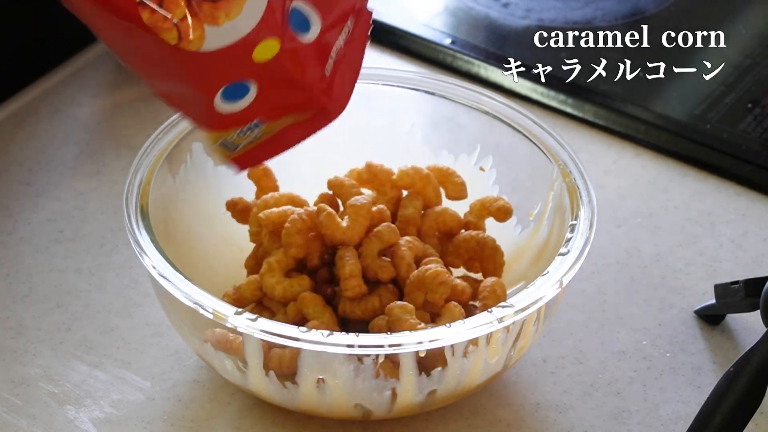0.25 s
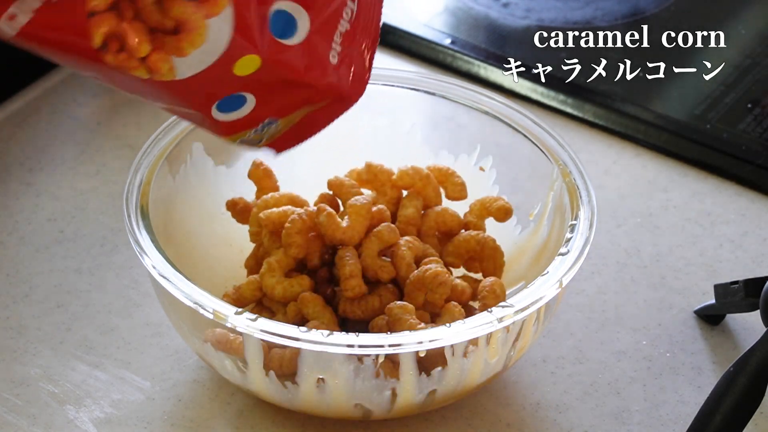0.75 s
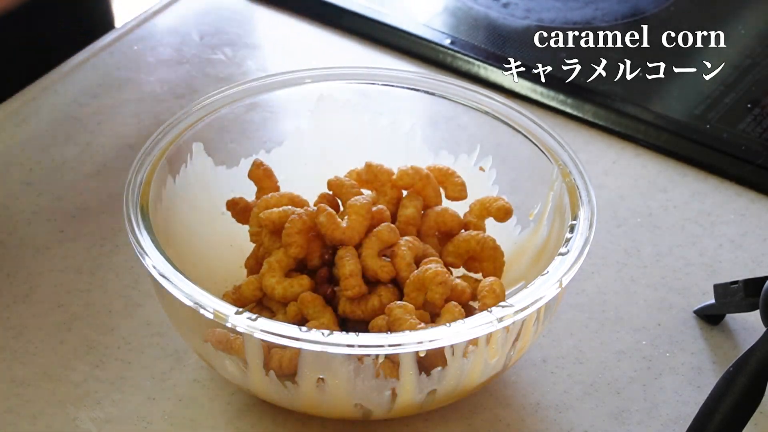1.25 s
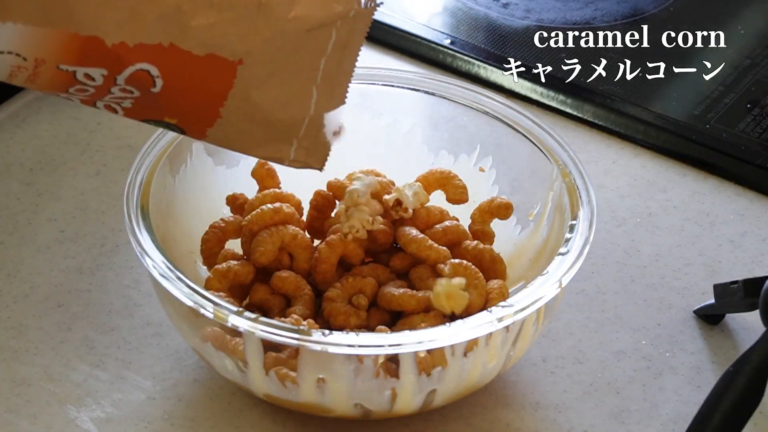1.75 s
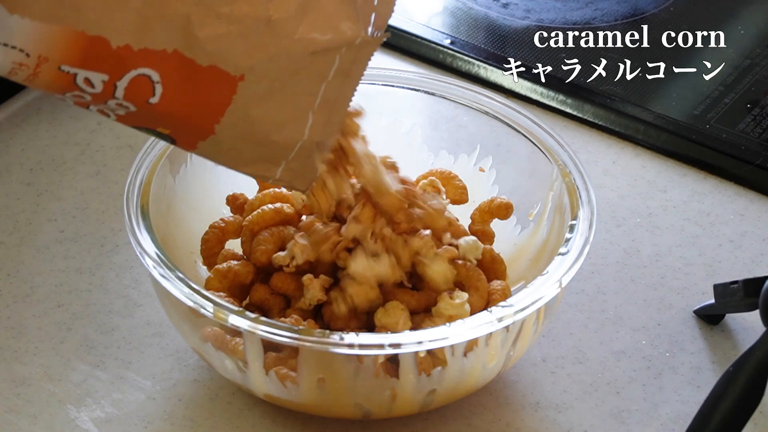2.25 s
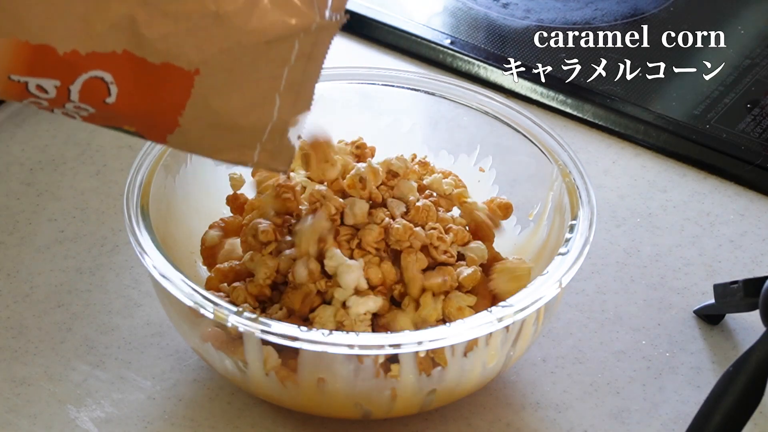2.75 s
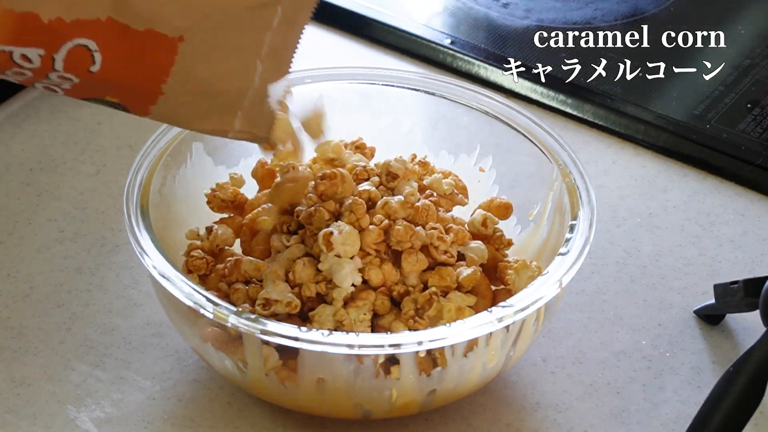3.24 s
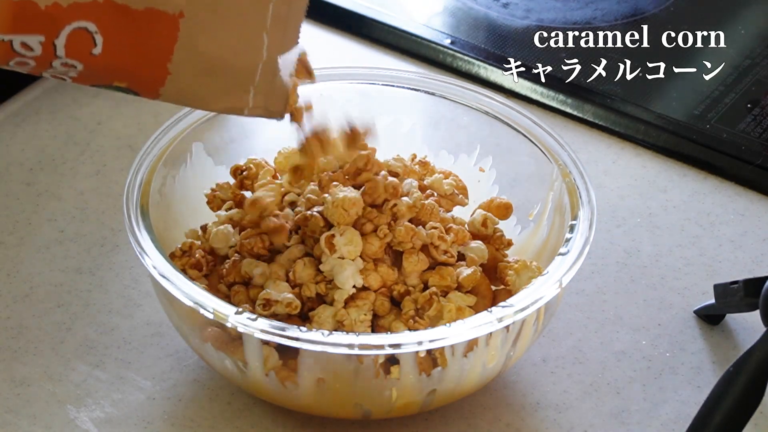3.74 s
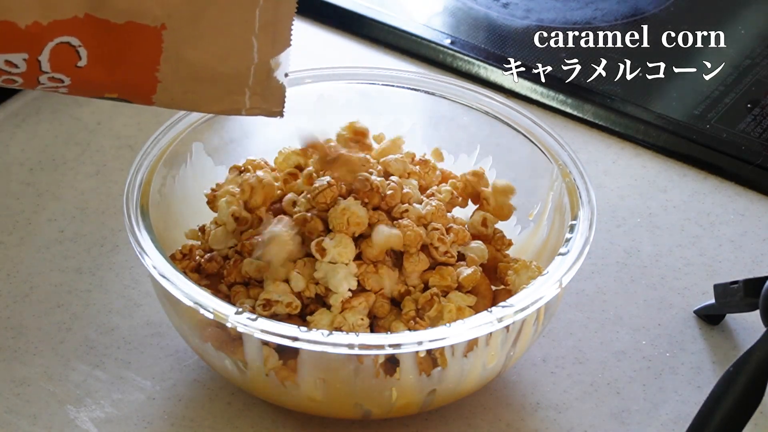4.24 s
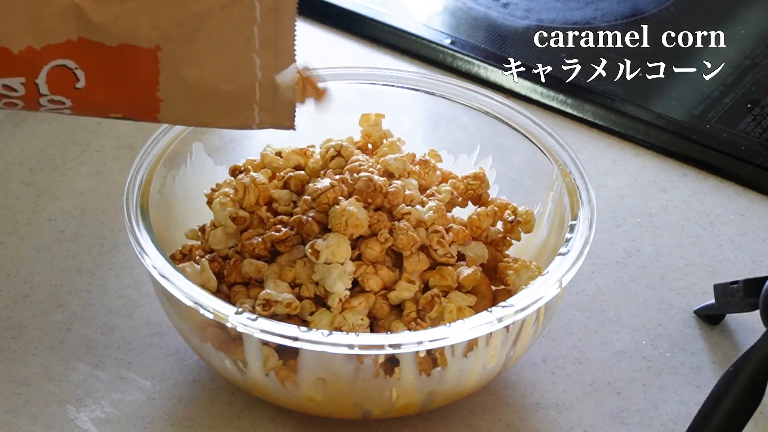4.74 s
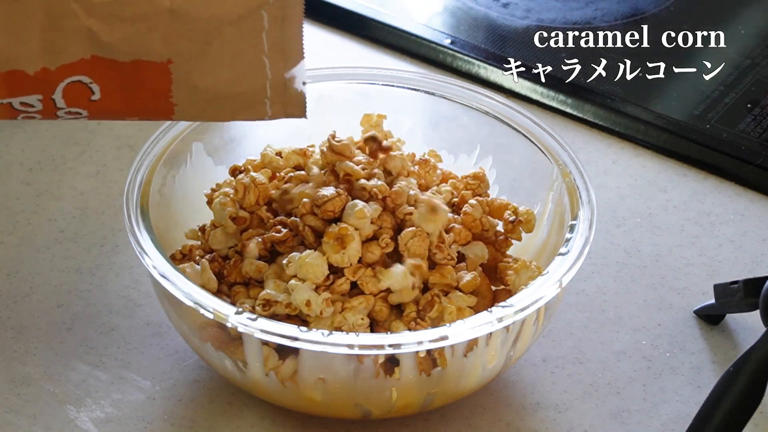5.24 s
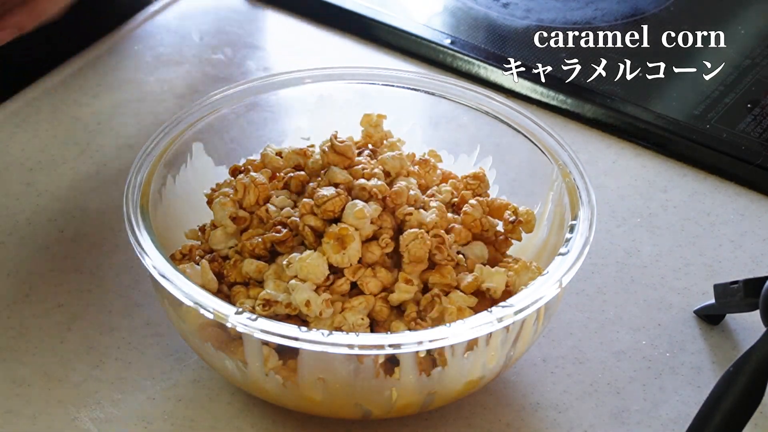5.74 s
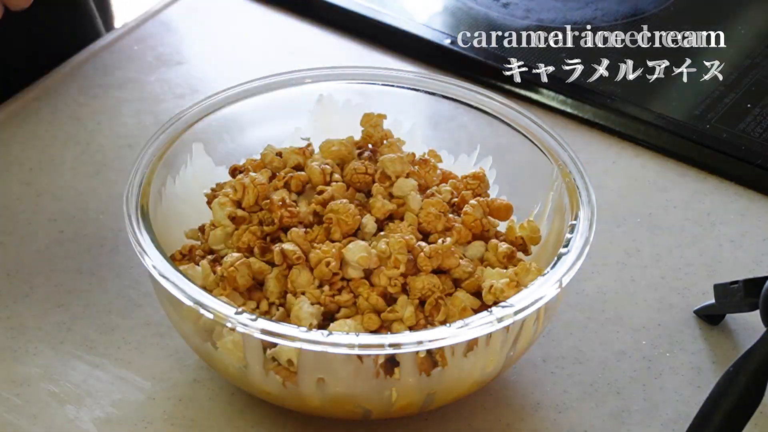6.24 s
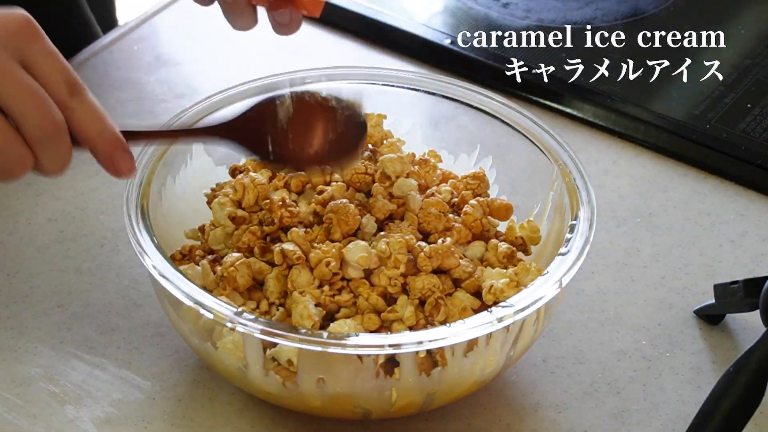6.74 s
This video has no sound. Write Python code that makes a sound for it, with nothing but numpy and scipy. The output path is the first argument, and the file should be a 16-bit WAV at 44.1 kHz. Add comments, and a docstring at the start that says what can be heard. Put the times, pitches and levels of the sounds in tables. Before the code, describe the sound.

Puffed snacks and popcorn patter from a crinkling stiff bag into a glass bowl, in swelling bursts with sharp snaps, in a small kitchen.

```python
"""In a small hard kitchen, puffed snacks are shaken out of a stiff bag into a glass bowl: three shots joined by cuts.
Pieces knock and patter on the heap and the bag crinkles: dense short rings, swelling with the stream and the handfuls.
Creases snap in dying clusters of clicks; blows on the glass and on the counter ring their modes.
A close stereo pair also hears the echoes of the room, a soft hush, an appliance's wavering lines and a motor tone."""
import sys
import numpy as np
from scipy import signal
from scipy.io import wavfile
from scipy.ndimage import uniform_filter1d

SR = 44100
rng = np.random.default_rng(int(sys.argv[2]) if len(sys.argv) > 2 else 0)


def volts(x):
    """Linear amplitude factor 10**(x/20) for a level x in dB, scalar or array-like."""
    e = np.asarray(x, float) / 20
    return 10 ** e


def output_pcm(signal):
    """Save a mono or channel-first signal as 16-bit PCM at the path in sys.argv[1].

    Samples are clipped to [-1, 1] before scaling.
    """
    pcm = np.clip(np.atleast_2d(signal).T, -1, 1) * 32767
    wavfile.write(sys.argv[1], SR, np.round(pcm).astype(np.int16))


N = 308244   # samples

# the stream of pieces and the handling of the bag, one list a shot:
# (time [s], patter of the stream [dB], crinkle of the bag [dB])
FLOW = [
    [(0.94, -74, -80), (0.95, -55.5, -44.5), (1.11, -51.5, -62), (1.39, -64, -71)],
    [(1.394, -43.5, -50), (1.72, -40, -49), (2.1, -33, -35), (2.43, -29.5, -31.5), (2.74, -39, -39),
     (3.12, -51, -55.5), (3.25, -37, -42.5), (3.33, -37.5, -38), (3.66, -45, -43.5), (3.94, -46, -49.5),
     (4.32, -49.5, -42.5), (4.56, -52.5, -64.5), (5.25, -53, -47), (5.54, -55, -59.5), (5.67, -34, -34.5),
     (5.86, -21.5, -29.5), (6.0, -35, -43), (6.24, -44, -56.5)],
    [(6.9, -81, -88), (6.93, -52, -49), (6.99, -55, -58)],
]


def rms_one(x):
    """Scales a sound to rms 1."""
    return x / np.sqrt(np.mean(x ** 2) + 1e-20)


def at_hz(points, hz):
    """Reads a curve of (frequency [Hz], value) points along log frequency."""
    return np.interp(np.log(hz), np.log(np.array(points)[:, 0]), np.array(points)[:, 1])


def high_pass(x, hz, order):
    """Butterworth filter that takes away what lies below hz."""
    return signal.sosfilt(signal.butter(order, hz, "high", fs=SR, output="sos"), x)


def without_bass(x):
    """Bag and pieces are too small to radiate low sound."""
    return high_pass(x, 731, order=4)


def ring(clicks, hz, t60):
    """A unit click sets a sine of height 1 ringing, which falls by 60 dB in t60 seconds."""
    radius = volts(-60 / (t60 * SR))
    turn = 2 * np.pi * hz / SR
    return signal.lfilter([0, np.sin(turn)], [1, -2 * radius * np.cos(turn), radius ** 2], clicks + 1e-18)


def drift(rate):
    """Chance wander of spread 1: straight lines between random knots, rate of them per second."""
    knots = rng.standard_normal(int(N / SR * rate) + 2)
    return np.interp(np.arange(N) / SR * rate, np.arange(len(knots)), knots) * np.sqrt(1.5)


def pouring(t, flow, start, end):
    """Gains of hollow knocks, patter and crinkle in one shot: the stream and the handfuls add in power."""
    # handfuls that land at one blow: (time [s], patter [dB], hollow knocks against it [dB], t60 [s])
    handfuls = [(0.001, -34, -19, .35), (1.093, -42, -5, 0.1), (1.126, -40, -2, 0.19),
                (1.151, -38, -3.5, 0.22), (1.159, -42, -5, 0.17), (1.279, -56, 7.5, 0.35),
                (1.52, -28, -17, 0.4), (1.747, -35, -9, 0.32), (1.802, -29.5, -5, 0.14),
                (1.982, -24, -8, 0.16), (2.018, -21, -14, 0.14), (2.754, -32, 1, 0.11),
                (2.781, -34.5, -8, 0.27), (3.262, -22, -8, 0.14), (3.296, -24.5, -1.5, 0.15),
                (3.881, -41, -25, 0.2), (4.064, -32, -7, 0.19), (4.12, -36.5, -13.5, 0.38),
                (4.224, -31, -20, 0.13), (4.565, -40.5, -5, .45), (6.054, -19, -11, 0.08),
                (6.241, -35, -14, 0.11), (6.926, -40.5, -27.5, 0.28)]
    # handfuls that gather and slide out:
    # (time [s], patter [dB], hollow knocks against it [dB], t60 [s], build-up [s per 30 dB])
    slides = [(1.5, -43.5, -13, 0.52, 0.5), (1.575, -36.5, 6.5, 0.55, 0.38), (3.44, -44.5, 9, 0.4, 0.4),
              (3.977, -30.5, -1, 0.49, 0.35), (4.771, -42, 2, 0.32, 0.08), (4.942, -42.5, -2, 0.22, 0.27),
              (5.08, -30.5, -2.5, 0.38, 0.0945), (6.09, -36, -3, 0.38, 0.63)]
    landing_s = 0.003           # build-up of a handful at one blow, s per 30 dB
    handful_crinkle_db = -4.5   # crinkle that goes with a handful, against its patter
    s, patter_db, crinkle_db = np.transpose(flow)
    patter = np.interp(t, s, patter_db)
    crinkle = np.interp(t, s, crinkle_db)
    # more hollow knocks while the stream swells, fewer while it thins
    trend_db_per_s = uniform_filter1d(np.gradient(patter) * SR, size=SR // 10)
    hollow = patter - 5.5 + 2.5 * np.tanh(trend_db_per_s / 8.4)
    running = t >= s[0]
    power = running * volts([hollow, patter, crinkle]) ** 2
    for at, db, hollow_db, t60, rise_s in slides + [row + (landing_s,) for row in handfuls]:
        if start <= at < end:
            shape_db = db + np.where(t < at, 30 * (t - at) / rise_s, 60 * (at - t) / t60)
            power = power + volts(shape_db + np.array([[hollow_db], [0], [handful_crinkle_db]])) ** 2
    return np.sqrt(power)


def grains(low_hz, high_hz, per_s, spread_db, cycles):
    """Tiny knocks come in clumps, each rings a few cycles at one of ten pitches; rms 1."""
    # colour of the grains: (frequency [Hz], level [dB per Hz])
    colour = [(150, -45), (250, -14.5), (331, 0), (446, -4.5), (570, -12), (741, -11), (1520, -2),
              (2160, -2.5), (4060, -0.5), (15100, -42), (16500, -50.5)]
    sizes = volts(spread_db * np.minimum(rng.exponential(1, N), 5)) * rng.choice([-1, 1], N)
    clumps = volts(3.0 * drift(60) + 1.5 * drift(14))
    born = rng.random(N) < per_s * clumps / SR
    pitches = np.geomspace(low_hz, high_hz, 10)
    dealt = rng.integers(0, 10, N)
    total = 0
    for k, hz in enumerate(pitches):
        rung = rms_one(ring(sizes * born * (dealt == k), hz, cycles / hz))
        # evenly spaced in log pitch, so each carries power per Hz times its pitch
        total = total + rung * volts(at_hz(colour, hz)) * np.sqrt(hz)
    return rms_one(total)


def knocks_patter_and_crinkle():
    """Steady grains of three sorts, low to high; the creases of the bag add lone bright ticks to the crinkle."""
    # hollow knocks, patter, crinkle:
    # (lowest [Hz], highest [Hz], usual rate [grains per s], size spread [dB], t60 [cycles])
    sorts = [(399, 1190, 2500.0, 3.0, 7.5), (1512, 5230, 4000.0, 0, 7.5), (5856, 9600, 5000.0, 3, 6.1)]
    # ticks of the creases, columns as above
    ticks = (4000, 16000, 120, 2.0, 2.5)
    knocks, patter, crinkle = [without_bass(grains(*row)) for row in sorts]
    crinkle = crinkle + volts(-11) * without_bass(grains(*ticks))
    return knocks, patter, crinkle


def cluster(a, b, t, t60):
    """A first click, a dying run of chance clicks, and a fainter, slower broad tail, the room's first dense echoes."""
    dying = volts(-60 * t / t60) + volts(-12 - 60 * t / 0.091)
    clicks = a * np.abs(b) ** 2.96 * dying
    return np.r_[1.94, clicks[1:]]


def lesser_snaps():
    """Snap rows at chance moments of the long shot, as strong as the bag is handled."""
    count = 150
    when, how = rng.random(count), rng.standard_normal((count, 3))
    s, _, crinkle_db = np.transpose(FLOW[1])
    at = s[0] + when * (s[-1] - s[0])
    peak_db = np.interp(at, s, crinkle_db) + 12.5 + 2.5 * how[:, 0]
    centre_hz = np.clip(3200 * volts(5.5 * how[:, 1]), 1500, 9000)
    edge_db = -3.5 + 5.5 * how[:, 2]
    return list(zip(at, peak_db, centre_hz, edge_db))


def add_peak(out, s, db, x):
    """Lays a sound into out at s seconds, its peak at db."""
    out[round(s * SR):][:len(x)] += volts(db) * x / np.abs(x).max()


def snaps():
    """A crease lets go in a dying cluster of clicks: a broad ring with a bright edge."""
    # single snaps of bag and pieces: (time [s], peak [dB], centre [Hz], bright edge against it [dB])
    marked_snaps = [(0.0064, -21, 3140, 1.5), (0.0772, -26, 4030, -14), (0.9476, -25.5, 3840, -25),
                    (1.0029, -16.5, 3580, -10), (1.0358, -29.5, 1750, -12), (1.063, -26.5, 4600, -8),
                    (1.1224, -36, 2040, -16), (1.1484, -13.5, 4700, -13), (1.1588, -20.5, 2610, -20),
                    (1.3345, -28, 3100, -2.5), (1.34, -32.5, 2500, -2), (1.5184, 2, 8900, -3.5),
                    (1.5236, -11.5, 3700, -6), (1.5776, -18, 3020, -9), (1.5944, -15, 3980, -7),
                    (1.7447, -24.5, 1970, -7.5), (1.8013, -23.5, 2090, -12), (1.9609, -19.5, 3190, 10.5),
                    (1.9804, -9, 4740, -4), (2.0163, -13, 2400, -1.5), (2.0433, -24, 3550, 13.5),
                    (2.2832, -14, 3300, -1), (2.7545, -15, 3560, -19), (2.7801, -13.5, 2680, -12),
                    (2.9666, -17, 7350, -4.5), (3.0812, -21, 3320, 9), (3.2599, -3, 4500, -16),
                    (3.2648, -6, 3480, -2), (3.2935, -5.5, 4870, -3), (3.5004, -28, 2100, -4),
                    (3.5637, -31.5, 3400, 13), (3.6693, -13.5, 6000, -21), (3.7306, -21.5, 3550, 0.5),
                    (3.7884, -12, 6500, -9), (3.8315, -14, 5650, -4), (3.8786, -23.5, 2920, 6.5),
                    (4.064, -34, 3030, 11), (4.1195, -23.5, 2870, 1.5), (4.147, -22.5, 2840, 7),
                    (4.2224, -25.5, 2560, 2.5), (4.3224, -21.5, 3120, 5.5), (4.4478, -22.5, 7220, -10),
                    (4.5027, -29, 6670, -11), (4.5645, -26, 2790, -3), (4.6806, -29.5, 2700, -21),
                    (4.9442, -28, 2940, 3), (5.0162, -21, 3200, -11), (5.1355, -17, 5300, -3.5),
                    (5.1671, -17, 6360, -3.5), (5.2988, -24, 6530, -7.5), (5.464, -34.5, 8040, -2.7),
                    (5.94, -12, 4170, -1.5), (6.0528, -10, 2490, -18), (6.2412, -24, 3740, -15),
                    (6.9242, -32, 3320, 4)]
    out, t = np.zeros(N + 4096), np.arange(4096) / SR
    for s, peak_db, hz, edge_db in lesser_snaps() + marked_snaps:
        a, b = rng.standard_normal((2, len(t)))
        clicks = cluster(a, b, t, t60=74 / hz)
        add_peak(out, s, peak_db, ring(clicks, hz, t60=4.5 / hz))
        add_peak(out, s, peak_db + edge_db, high_pass(clicks, 7500, order=2))
    return out[:N]


def hollow_pieces():
    """A hollow piece knocks low: a short cluster rings it at a pitch of its own."""
    # single knocks: (time [s], peak [dB])
    knocks = [(1.1481, -27), (1.5184, -17), (1.7449, -49), (1.9804, -14), (2.9662, -35), (3.2588, -11),
              (4.775, -31), (5.082, -31), (5.4685, -30), (6.0526, -11.5), (6.132, -22)]
    out, t = np.zeros(N + 4096), np.arange(4096) / SR
    for s, peak_db in knocks:
        a, b = rng.standard_normal((2, len(t)))
        hz = 1010 * volts(2.4 * rng.standard_normal())
        add_peak(out, s, peak_db, ring(cluster(a, b, t, t60=0.0067), hz, t60=0.0087))
    return out[:N]


def clinks():
    """Each blow rings every mode of the bowl; a soft blow spares the high ones, the heap then stills the glass."""
    # pieces on the glass: (time [s], level [dB], softness of the blow [dB per octave], free ringing [s])
    blows = [(0.001, -30, 5, .15), (2.478, -20, 0, .3), (3.045, -42, 10, .15), (3.41, -31, 4, .07),
             (4.122, -28.5, 14, .21)]
    # modes of the bowl: (frequency [Hz], level [dB], t60 [s])
    glass = [(587, -25, .9), (1545, -10.5, .8), (2837, 0, .18), (4436, 0, .09), (6228, -2, .075)]
    soft_above_hz = 1545
    out, t = np.zeros(N + SR), np.arange(SR // 2) / SR
    for s, blow_db, soft, free_s in blows:
        stilled = volts(-600 * np.maximum(t - free_s, 0))
        at = round(s * SR)
        for hz, level_db, t60 in glass:
            spared_db = soft * max(np.log2(hz / soft_above_hz), 0)
            out[at:at + len(t)] += volts(blow_db + level_db - spared_db) * stilled * ring(t == 0, hz, t60)
    return out[:N]


def heap_thud():
    """The heap settling on the counter: steady low grains, still without their swing."""
    # (lowest [Hz], highest [Hz], usual rate [grains per s], size spread [dB], t60 [cycles])
    thud = (157, 550, 1500.0, 1.9, 4.5)
    return high_pass(grains(*thud), thud[0], order=2)


def bag_drum(t):
    """The empty bag drums as it is swept away: low grains under a bell-shaped swell."""
    # (lowest [Hz], highest [Hz], usual rate [grains per s], size spread [dB], t60 [cycles])
    drum = (417, 880, 2700, 2.1, 14)
    middle_s, top_db, width_s = 5.84, -32.5, 0.06
    swell = volts(top_db) * np.exp(-0.5 * ((t - middle_s) / width_s) ** 2)
    return swell * high_pass(grains(*drum), drum[0], order=3)


def bumps():
    """A hand bumps the counter and rings its low modes, softened above 300 Hz."""
    # (time [s], level [dB])
    blows = [(1.1, -42.5), (6.931, -49.5)]
    # modes of the counter: (frequency [Hz], level [dB], t60 [s])
    counter = [(99, -6, 0.33), (135, -1.5, 0.17), (219, 2, 0.12)]
    pushes = np.zeros(N)
    for s, db in blows:
        pushes[round(s * SR)] = volts(db)
    rings = sum(volts(db) * ring(pushes, hz, t60) for hz, db, t60 in counter)
    return signal.sosfilt(signal.butter(2, 300, fs=SR, output="sos"), rings)


def stereo_bands(size):
    """Half-octave bands of noise, left and right as alike as the close pair of capsules makes them."""
    # (frequency [Hz], left-right likeness [0 to 1])
    likeness = [(60, 0.97), (180, 0.89), (550, 0.69), (1650, 0.91), (4970, 0.34), (15000, 0.2)]
    edges = 22 * 2 ** np.arange(0, 10, 0.5)
    white = rng.standard_normal((2, 2, size))   # neighbouring bands take turns at two pairs of noises
    for k, (low, high) in enumerate(zip(edges, edges[1:])):
        band = signal.butter(2, [low, high], "band", fs=SR, output="sos")
        mid, side = signal.sosfilt(band, white[k % 2])
        centre_hz = np.sqrt(low * high)
        alike = np.clip(at_hz(likeness, centre_hz), 0, 1)
        yield centre_hz, np.sqrt(1 + alike) * mid + np.sqrt(1 - alike) * side * [[1], [-1]]


def kitchen_echo():
    """Dense echoes build up in a few ms and die band by band; unit energy."""
    # (frequency [Hz], t60 [s])
    room_t60 = [(200, 1), (1000, 0.26), (4000, 0.4), (12000, 0.15)]
    t = np.arange(SR * 3 // 4) / SR
    tail = sum(band * volts(-60 * t / at_hz(room_t60, hz)) for hz, band in stereo_bands(size=len(t)))
    tail = tail * (1 - np.exp(-t / 0.0011))
    return tail / np.sqrt(np.sum(tail ** 2) / 2)


def kitchen_hush():
    """Soft broadband noise of the kitchen, each band wavering slightly."""
    # relative spectrum: (frequency [Hz], level [dB per Hz])
    spectrum = [(15, -35), (25, -17), (53, -9), (138, 0), (238, -1.5), (259, -10), (288, -4.5), (651, -10),
                (4480, -16.5), (4990, -20.5), (5570, -20.5), (6920, -21.5), (15200, -33), (16500, -57)]
    bands = stereo_bands(size=N)
    hush = sum(band * volts(at_hz(spectrum, hz) + 0.5 * drift(2.8)) for hz, band in bands)
    return volts(-58.5) * rms_one(hush)


def appliance():
    """Wavering hum and whine, noise ringing in narrow resonances, over a steady motor tone."""
    # (frequency [Hz], width [Hz], level [dB rms])
    lines = [(95.8, 8.7, -67), (212.8, 14, -65), (234.8, 15, -66.5), (4620, 45, -76.5), (5460, 45.0, -74.5)]
    motor_hz, motor_rms_db = 48.4, -70
    wavering = sum(volts(db) * rms_one(ring(rng.standard_normal(N), hz, 2.1 / width)) for hz, width, db in lines)
    motor = np.sqrt(2) * np.sin(2 * np.pi * motor_hz * np.arange(N) / SR)
    return wavering + volts(motor_rms_db) * motor


def close_pair(near, wander):
    """The bag hangs to the left: the right capsule hears it a shade later and softer; the treble scatters."""
    left_db, left_leads = 0.26, 0.39           # dB, samples (at low frequencies)
    scatter_db, left_treble = -17.5, 0.095     # treble to a wandering side, and share that leans left
    late = (1 - left_leads) / (1 + left_leads)
    right = signal.lfilter([late, 1], [1, late], near)   # all-pass delay
    direct = np.array([near, right]) * volts([[left_db / 2], [-left_db / 2]])
    treble = high_pass(near, 6010, order=1)
    return direct + (volts(scatter_db) * wander + left_treble) * treble * [[1], [-1]]


def scene():
    """Lays the shots over one background; every shot has its own echoes, which stop at the cut."""
    # shot boundaries: (time [s])
    cuts = [0, 1.393, 6.248, 7.0]
    room_db = -13.5
    thud_db, thud_follows = -29.5, 0.54   # level, share of the hollow knocks' swing in dB that it follows
    t = np.arange(N) / SR
    out = kitchen_hush() + appliance()
    parts = knocks_patter_and_crinkle()
    hits = without_bass(snaps() + hollow_pieces()) + clinks() + bumps()
    thud, drum = heap_thud(), bag_drum(t)
    echo, wander = kitchen_echo(), drift(600)
    for flow, start, end in zip(FLOW, cuts, cuts[1:]):
        shown = (t >= start) & (t < end)
        gains = shown * pouring(t, flow, start, end)
        stream = sum(gain * part for gain, part in zip(gains, parts))
        settling = volts(thud_db) * gains[0] ** thud_follows * thud
        near = stream + settling + shown * (hits + drum)
        wet = signal.fftconvolve(near[None], echo, axes=1)[:, :N]
        out = out + shown * (close_pair(near, wander) + volts(room_db) * wet)
    return out


def top_cut(x):
    """Nothing passes above the cut-off."""
    return signal.sosfilt(signal.butter(12, 16680, fs=SR, output="sos"), x)


def record(dry):
    """The microphone thins the bass below 33 Hz, the top is cut steeply by 15.9 kHz."""
    thin = high_pass(dry, 33, order=3)
    cut = signal.sosfilt(signal.cheby2(10, 30, 15900, fs=SR, output="sos"), thin)
    return top_cut(cut)


dry = scene()
out = record(dry)
output_pcm(out)
```